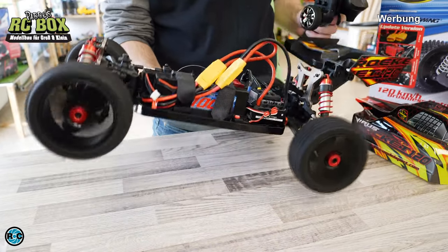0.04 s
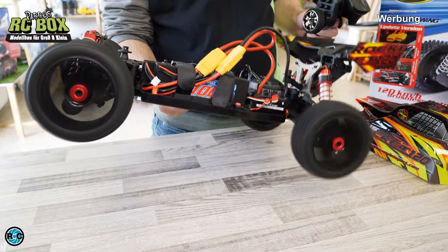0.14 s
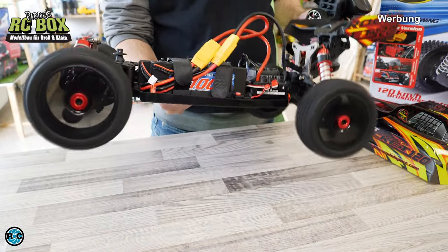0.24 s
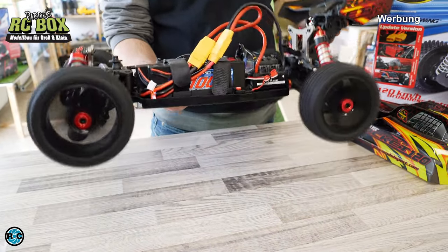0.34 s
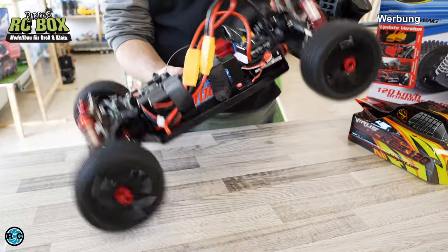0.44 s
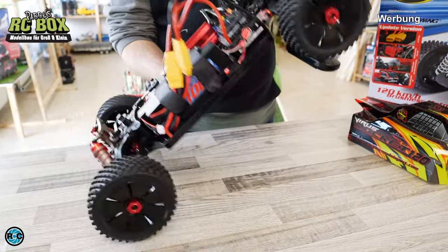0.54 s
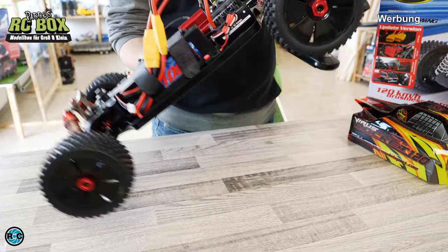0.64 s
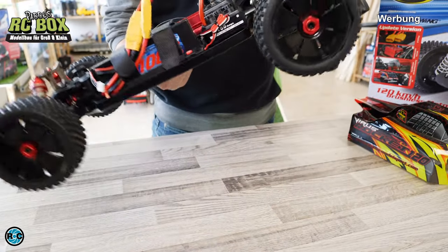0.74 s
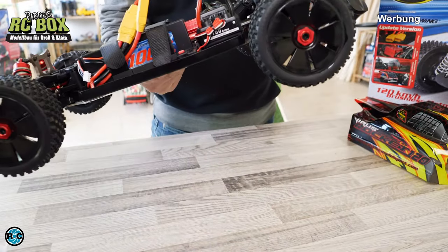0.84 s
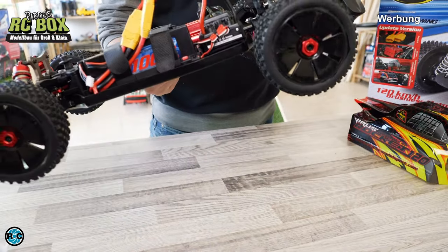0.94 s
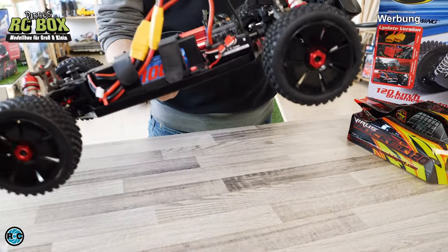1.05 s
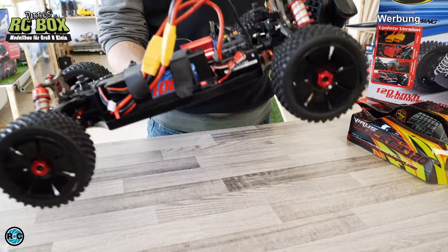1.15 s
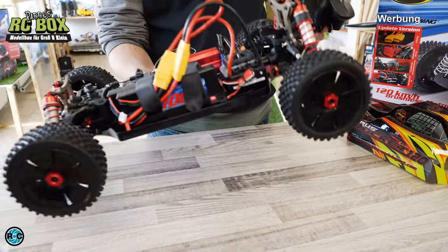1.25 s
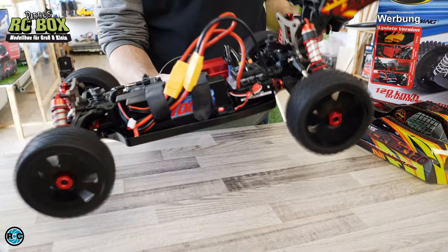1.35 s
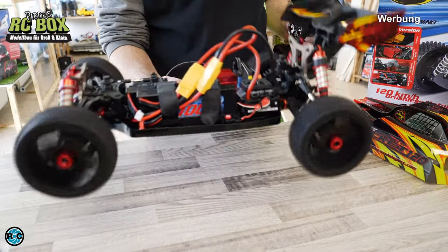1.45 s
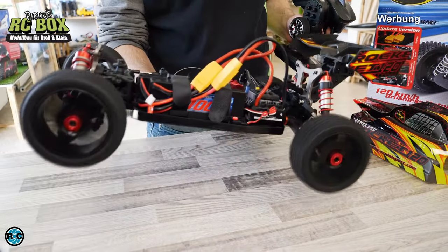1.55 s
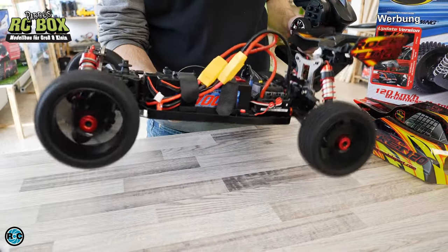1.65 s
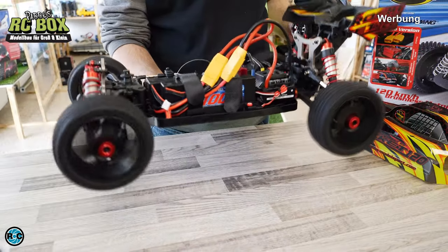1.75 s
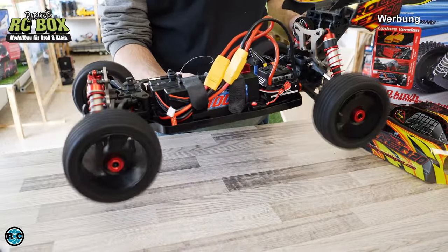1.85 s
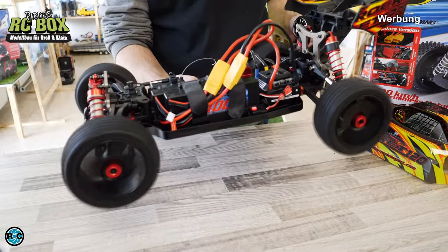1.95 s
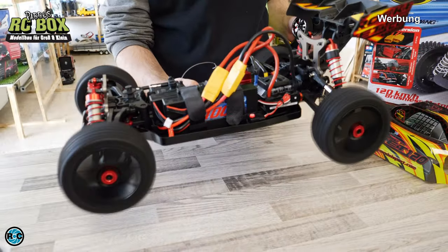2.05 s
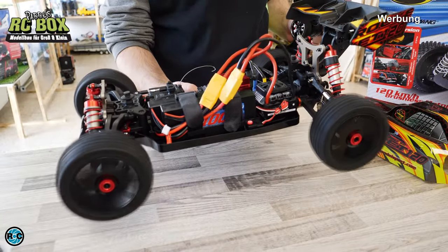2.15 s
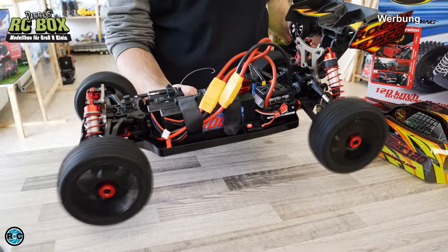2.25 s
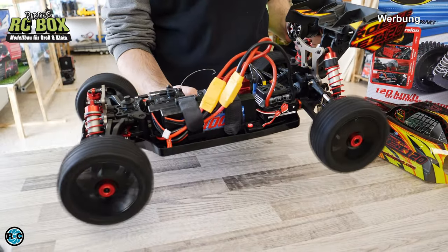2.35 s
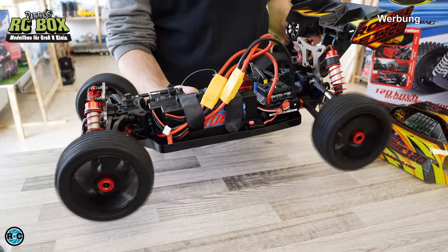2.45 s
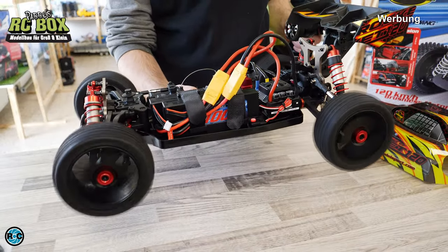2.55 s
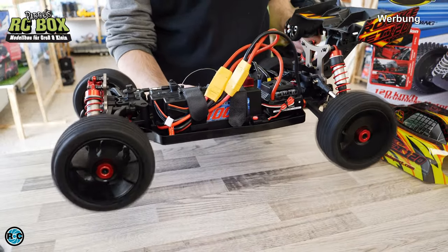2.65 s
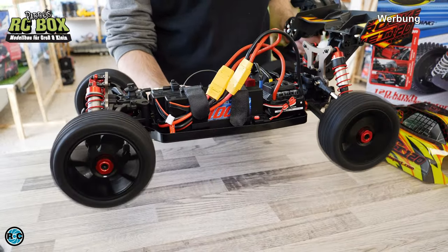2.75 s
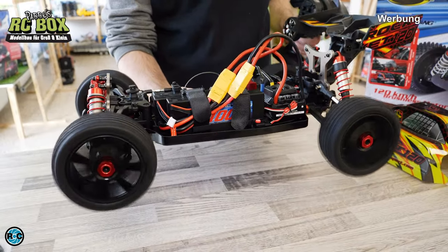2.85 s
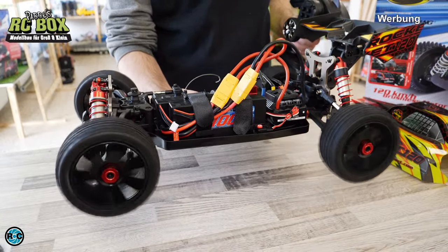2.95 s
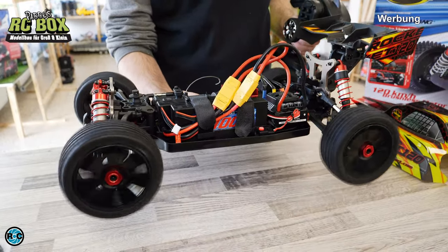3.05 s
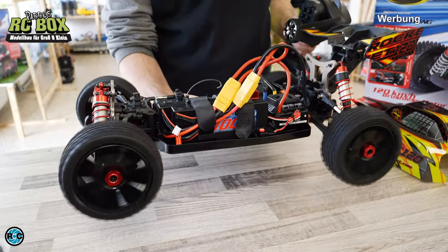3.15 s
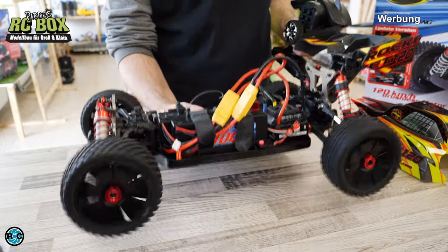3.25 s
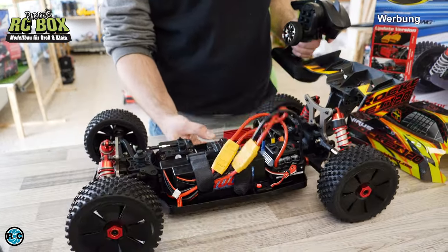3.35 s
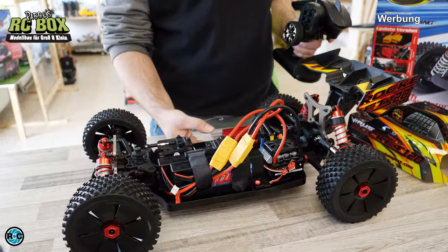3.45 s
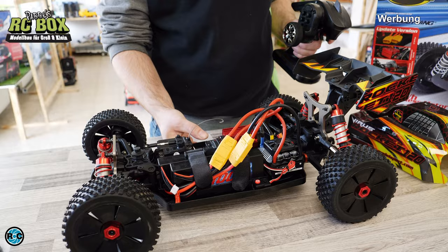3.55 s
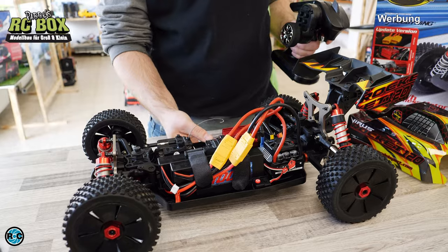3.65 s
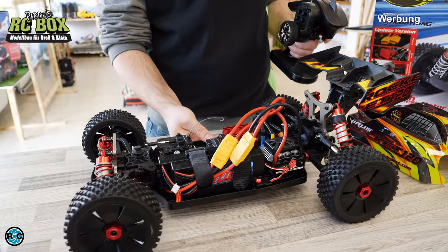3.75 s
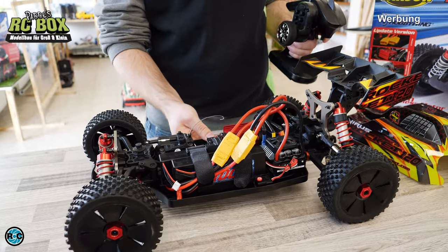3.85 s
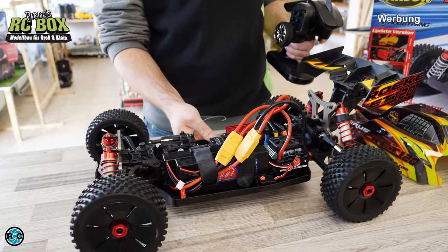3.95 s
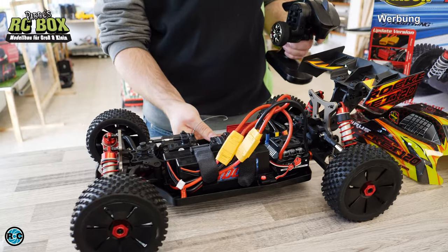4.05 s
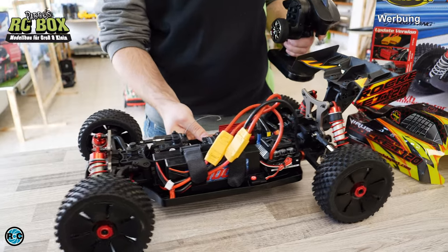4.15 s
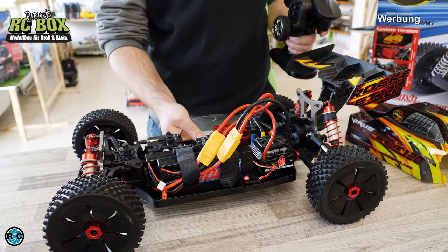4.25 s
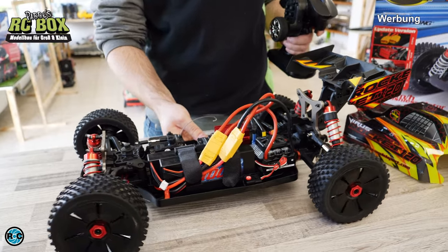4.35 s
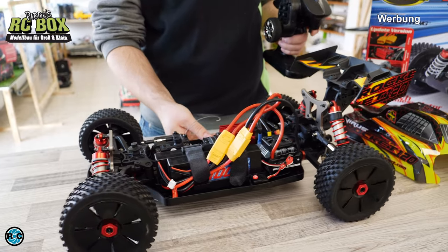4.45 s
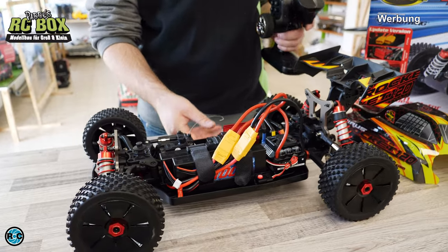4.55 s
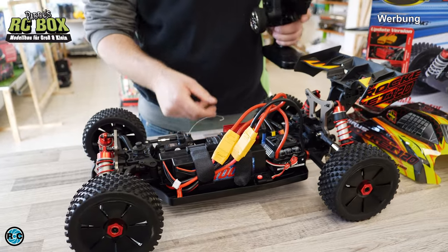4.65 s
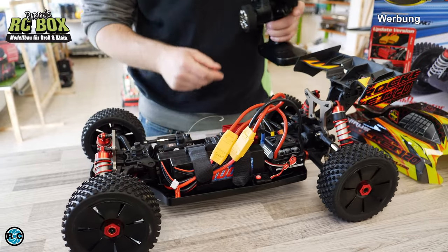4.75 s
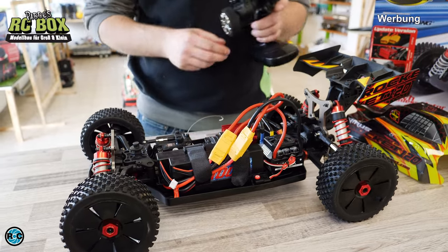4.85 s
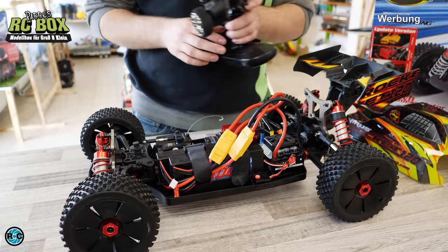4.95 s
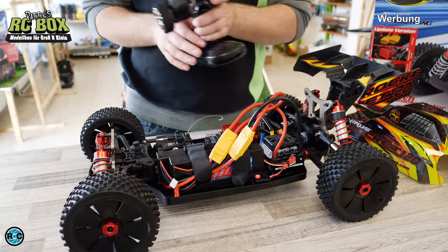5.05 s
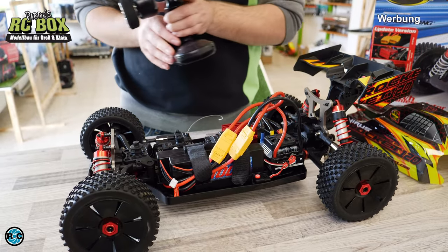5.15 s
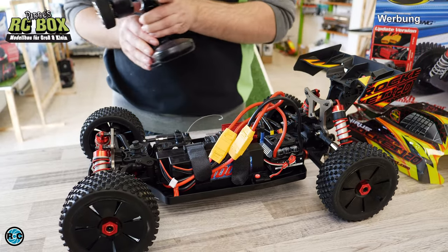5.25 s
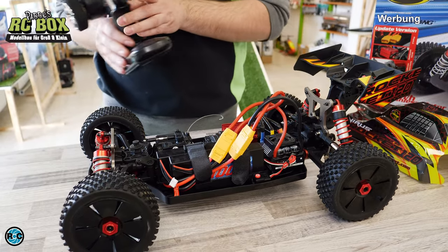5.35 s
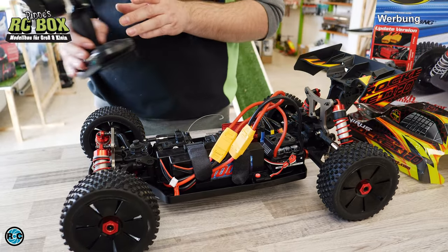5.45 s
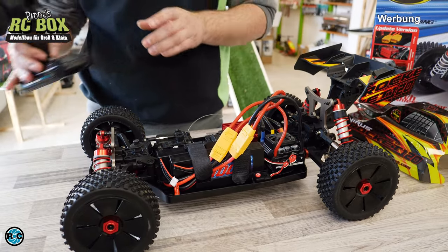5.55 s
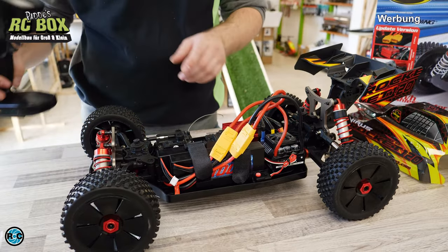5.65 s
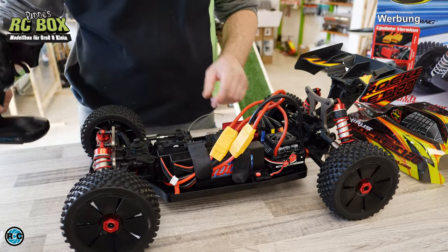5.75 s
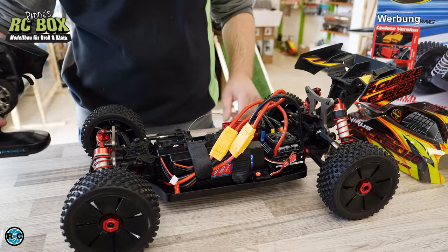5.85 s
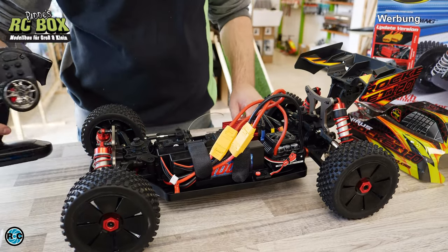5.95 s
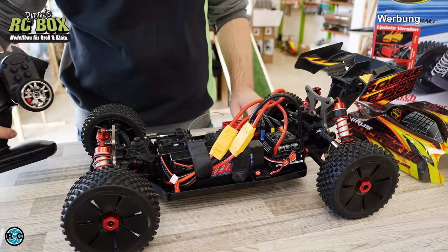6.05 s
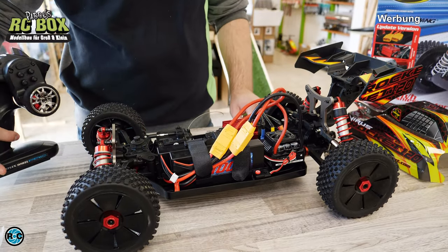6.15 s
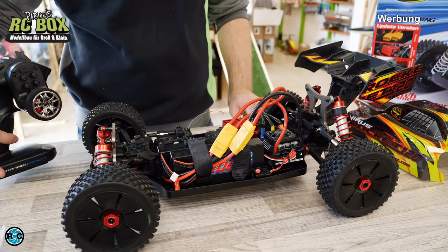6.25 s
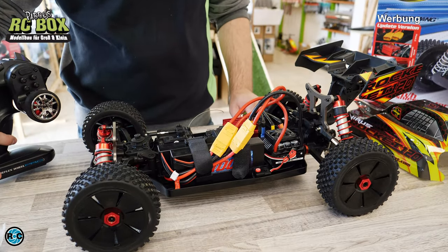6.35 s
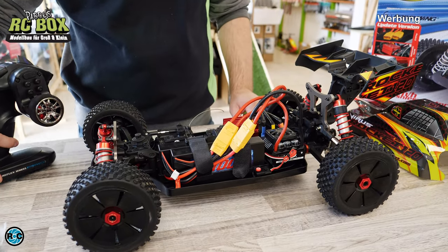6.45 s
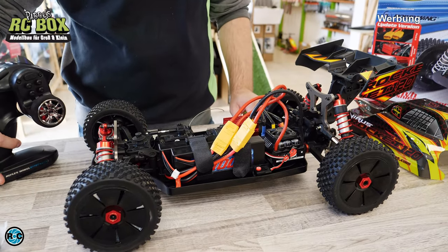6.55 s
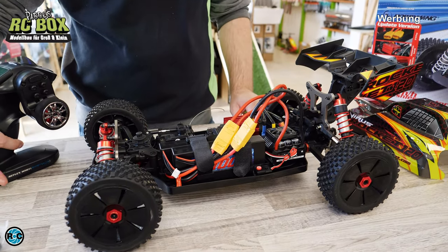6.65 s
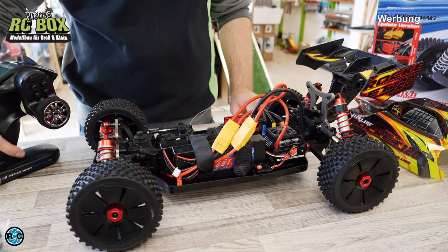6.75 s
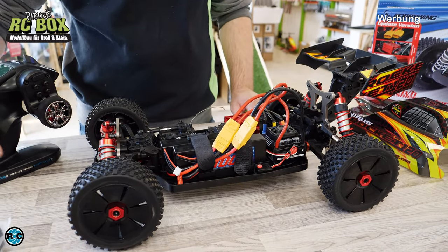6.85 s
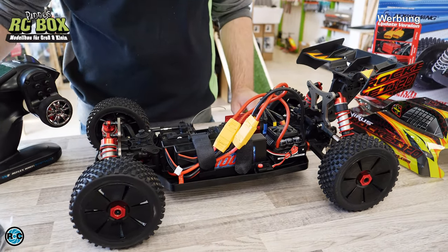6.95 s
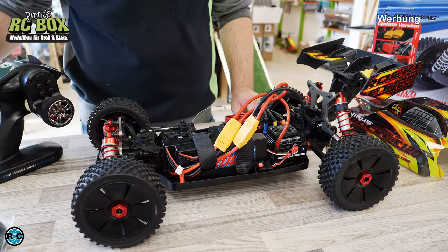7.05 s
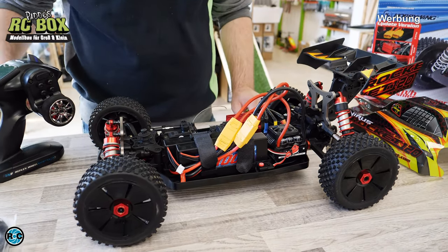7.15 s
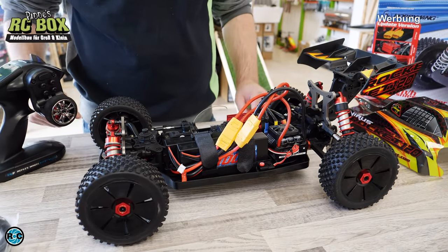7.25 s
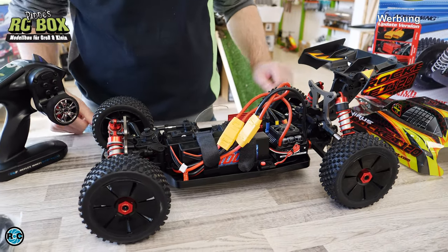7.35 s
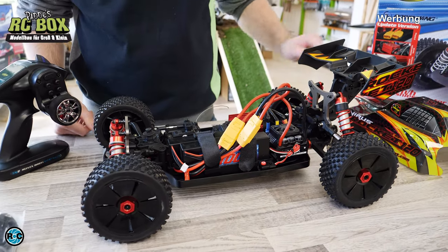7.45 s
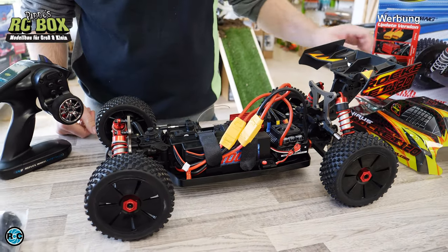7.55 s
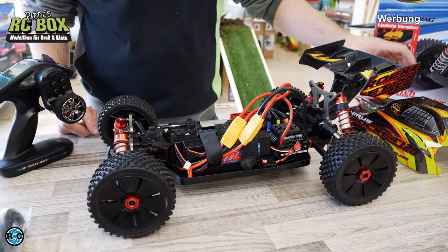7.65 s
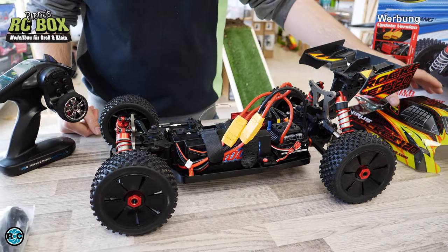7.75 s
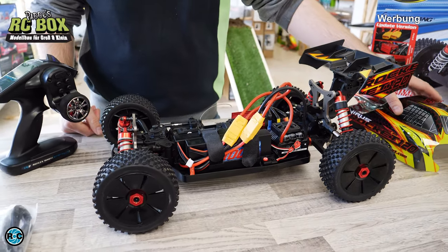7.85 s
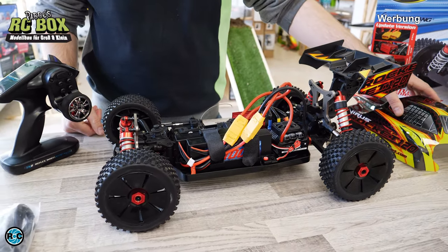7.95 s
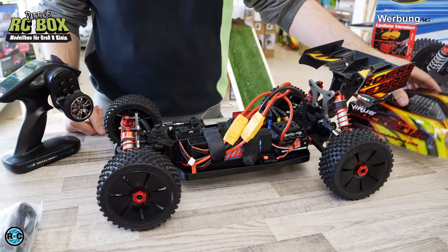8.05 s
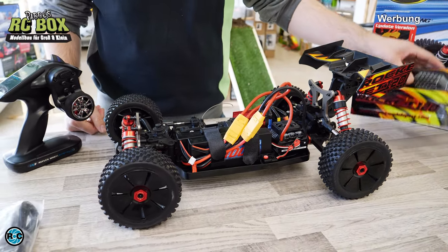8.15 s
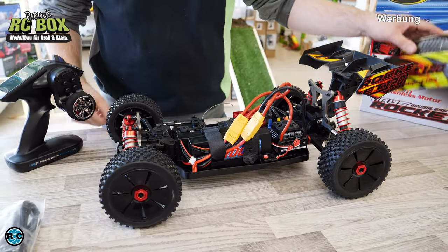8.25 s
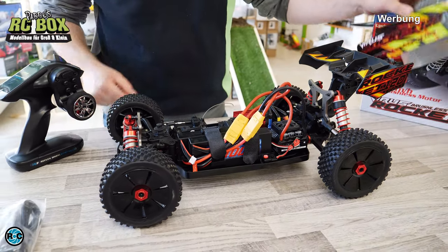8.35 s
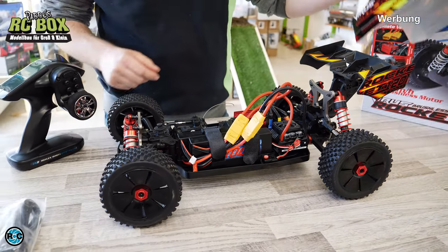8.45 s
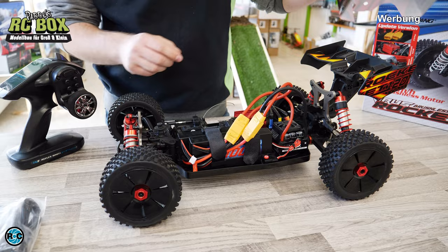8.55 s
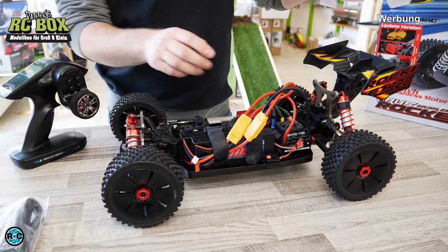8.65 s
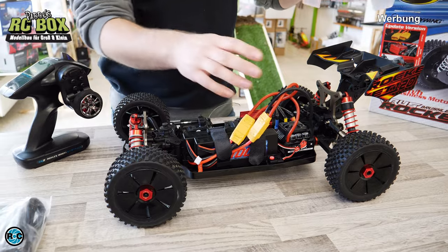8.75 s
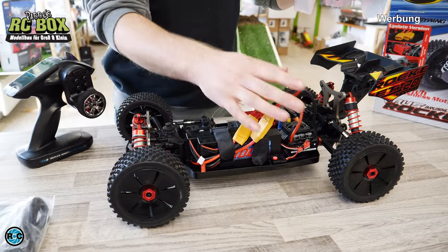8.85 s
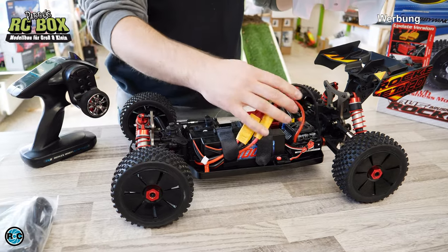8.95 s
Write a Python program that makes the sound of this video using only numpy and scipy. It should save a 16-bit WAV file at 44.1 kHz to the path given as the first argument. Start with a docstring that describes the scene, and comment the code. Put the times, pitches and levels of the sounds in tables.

```python
"""Electric model buggy over a workbench

Its motor revs, brakes with a buzz, revs again and coasts down: tooth knocks, mesh tones and chopped current.
Drive shafts slam in their play, ever more sparsely; on its tyres the car jerks in bursts of slams.
Then the transmitter is put down and the body shell picked up: knocks, rustles, a squeak and a scrape.
Struck bodies are resonant filters; air, a fan and the echoes of a small shop surround them."""
import sys
import numpy as np
from scipy import signal
from scipy.fft import rfft, irfft
from scipy.io import wavfile
from scipy.ndimage import uniform_filter1d

SR = 44100
rng = np.random.default_rng(int(sys.argv[2]) if len(sys.argv) > 2 else 0)


def store_wav(level_fs):
    """Save 16-bit WAV to argv[1]."""
    pcm = np.round(np.clip(np.atleast_2d(level_fs), -1, 1) * 32767)
    wavfile.write(sys.argv[1], SR, pcm.T.astype(np.int16))


N = 397341
T = np.arange(N) / SR
PINION_TEETH = 13
STALL_TURNS_PER_S = 32  # gears fade out below about this


def amp(db):
    """Gain of a level in dB."""
    return 10 ** (np.asarray(db) / 20)


def unit(x):
    """Scale to rms 1."""
    return x / np.sqrt(np.mean(x ** 2) + 1e-20)


def read(points, hz):
    """A spectrum, joined by straight lines over log frequency."""
    f, value = np.transpose(points)
    return np.interp(np.log(hz + 1), np.log(f + 1), value)


def add(mix, s, sound):
    """Mix a sound in at s seconds, cut at the end."""
    part = mix[..., max(round(s * SR), 0):][..., :sound.shape[-1]]
    part += sound[..., :part.shape[-1]]


def drift(rate_hz):
    """Random wander below rate_hz, rms 1."""
    spectrum = rfft(rng.standard_normal(N))
    return unit(irfft(spectrum * (np.fft.rfftfreq(N, 1 / SR) < rate_hz), N))


def envelope(on, off, attack, release, db=0):
    """Gain over time (all in s): straight attack, hold, exponential release."""
    rise = np.clip((T - on) / attack, 0, 1)
    return amp(db) * rise * np.exp(-np.clip((T - off) / release, 0, 20))


def lift(peaks, hz):
    """The dB that a set of resonances adds at a frequency."""
    return sum(g / (1 + (2 * (hz - f) / width) ** 2) for f, width, g in peaks)


def body(spectrum, peaks, splits_hz, size=4096):
    """Causal minimum-phase responses of a resonant body in three ranges: low, middle, high."""
    hz = abs(np.fft.fftfreq(size, 1 / SR))
    db = read(spectrum, hz) + lift(peaks, hz)
    low, lower = (1 / (1 + (hz / f) ** 14) for f in splits_hz[::-1])
    shares = np.sqrt([lower, abs(low - lower), 1 - low])
    log_gain = np.log(amp(db) * shares + 1e-5)
    return np.fft.ifft(np.exp(np.conj(signal.hilbert(log_gain)))).real[:, :size // 2]


def strike(responses, dbs, chatter, after_db, after, rise=0.00061):
    """A contact builds up and chatters, loose parts buzz on, the body rings; dbs set the first 7 ms."""
    t = np.arange(SR // 10) / SR
    contact = np.exp(-t / np.array(chatter)[:, None]) + amp(after_db) * np.exp(-t / after)
    contact = contact * (1 - np.exp(-t / rise))
    force = rng.choice([-1, 1], contact.shape) * contact
    rings = signal.fftconvolve(force, responses, axes=1)
    return sum(amp(db) * ring / ring[:SR // 140].std() for db, ring in zip(dbs, rings))


def hiss(spectrum):
    """Steady noise of a given colour, rms 1."""
    gain = amp(read(spectrum, np.fft.rfftfreq(N, 1 / SR)))
    return unit(irfft(rfft(rng.standard_normal(N)) * gain, N))


def shaft_speed():
    """Turns a second: a braked rev, a launch that coasts down, a last blip; never below 1."""
    # motor speed curves: t/s, shaft speed/(turns/s)
    rev = [(0, 230), (.1, 274), (.16, 291), (.3, 304), (.37, 291), (.45, 235), (.55, 135), (.7, 0)]
    launch = [(1.375, 0), (1.413, 95), (1.425, 111), (1.44, 162), (1.455, 203), (1.48, 262), (1.51, 365),
              (1.55, 404), (1.59, 431), (1.62, 432), (1.8, 359), (2, 298), (2.2, 237), (2.42, 196),
              (2.6, 153), (3, 81), (3.4, 0)]
    blip = [(3.26, 30), (3.3, 78), (3.35, 70), (3.46, 0)]
    curves = [np.interp(T, *np.transpose(c), left=0) for c in (rev, launch, blip)]
    return np.maximum(np.max(curves, axis=0), 1)


def gear_gains(speed, cruise_turns_per_s=300, attack_s=.012, release_s=.02):
    """Gains of three gear noises and three gear tones: each follows the speed and shifts under load."""
    # clatter, tooth hiss, steel ring: relative level at cruise/dB, slope/(dB per doubling of speed)
    noise_levels = [(-22, 1.5), (-25.5, 5), (-26.5, 3.2)]
    # pinion mesh, bevel mesh, growl: same columns
    tone_levels = [(-24.5, 14), (-26, 6), (-33, 13)]
    # tooth load as the motor pulls or brakes, or the wheels push it: on t/s, off t/s,
    # then added level/dB of clatter, tooth hiss, steel ring, pinion mesh, bevel mesh
    loads = [(-.02, .37, -2.5, 2.2, 2.4, 6, -10), (.385, .42, 0, 1.5, 3, -8, -10),
             (.44, .65, -7.5, -.5, -1.5, -14, -16), (1.371, 1.445, -3, -3, 4, 0, 0),
             (1.465, 1.62, -3.5, -2, 4, -2, -2), (2.1, 2.4, 0, 0, 0, 2, 1), (2.94, 3.15, 0, 0, 0, -3, 8),
             (3.28, 3.365, 1.5, 6, 8.5, 0, 19)]
    doublings = np.log2(speed / cruise_turns_per_s)
    dbs = np.array([db + slope * doublings for db, slope in noise_levels + tone_levels])
    for on, off, *added_db in loads:
        dbs[:len(added_db)] += np.outer(added_db, envelope(on, off, attack_s, release_s))
    return np.split(amp(dbs) * np.clip((speed - 1) / STALL_TURNS_PER_S, 0, 1), 2)


def gearbox_body():
    """The gearbox colours tooth noise and mesh tones."""
    # broad response: f/Hz, relative level/(dB per Hz)
    spectrum = [(100, -58.5), (250, -34.5), (380, -21.5), (490, -8), (700, -10), (1100, -6.5), (1500, 2),
                (2000, 0), (2700, -6), (3600, -13), (5000, -12), (6800, -18.5), (9500, -10), (11000, -15.5),
                (12500, -24.5), (16000, -23.5)]
    # resonances: f/Hz, width/Hz, added level/dB
    peaks = [(520, 60, 2), (630, 45, 7.5), (727, 98, -2), (835, 25, 3), (1060, 110, 4), (1290, 80, 3),
             (1490, 170, 5.5), (1900, 120, 2.5), (2230, 120, 1.5), (15200, 350, 10)]
    return body(spectrum, peaks, (3000, 8000))


def ping(hz, decay, rise=.0008):
    """A steel drive cup rings in a pair of modes, the second drawn at random."""
    t = np.arange(SR // 20) / SR
    ring = np.sin(2 * np.pi * hz * t) + .5 * np.sin(2 * np.pi * rng.uniform(8850, 9600) * t)
    ring = ring * np.exp(-t / decay) * (1 - np.exp(-t / rise))
    return ring / ring[:SR // 140].std()


def gears(frame, speed, gains, hits_per_turn=6, spread_db=1.8, rub=0.46, throb_db=1.9,
          wheel_ratio=.16, trims_db=(0, -1, -3), cups_db=-4, cups_per_turn=1.3):
    """Teeth and loose joints strike at a rate set by speed, harder once per turn of the drive shafts."""
    hit = rng.random(N) < hits_per_turn * speed / SR
    size = amp(spread_db * np.minimum(rng.exponential(1, N), 4)) * hit
    size = unit(size / np.sqrt(speed)) * rng.choice([-1, 1], N)
    wheel_phase = 2 * np.pi * np.cumsum(speed) * wheel_ratio / SR
    throb = amp(throb_db * (np.sin(wheel_phase) + drift(150)))

    joint = rng.integers(0, 8, N)
    t = np.arange(256) / SR
    contacts = rng.standard_normal((8, len(t))) * np.exp(-t / 0.00074)
    knocks = sum(signal.oaconvolve(size * (joint == k), unit(c))[:N] for k, c in enumerate(contacts))
    knocks = unit(knocks) * throb
    out = np.zeros(N)
    for k, response in enumerate(frame):
        # sliding teeth smooth the upper ranges
        force = knocks + rub * (1, 4, 3)[k] * rng.standard_normal(N)
        out += amp(trims_db[k]) * unit(signal.oaconvolve(force, response)[:N]) * gains[k]

    cup_hit = rng.random(N) < cups_per_turn * speed / SR
    hits = cup_hit * rng.uniform(.5, 1, N) * throb / np.sqrt(speed)
    cups = sum(signal.oaconvolve(hits * (joint == k), ping(hz, decay=0.0027))[:N]
               for k, hz in enumerate(np.linspace(9100, 10600, 8)))
    return out + amp(cups_db) * unit(cups) * gains[-1]


def whine(frame, speed, gains, wobble=.0035, flutter_db=4, growl_width_hz=170, mesh_db=-1.2,
          octave_db=-8, bevel_order=26 / 3, growl_order=5):
    """Mesh tones follow the shaft through the gearbox; play makes them flutter and smears a growl."""
    # driven shafts' hum: multiple of shaft speed, level/dB
    hum_orders = [(.6, -24), (0.999, -18.5), (2, -0.5), (2.44, -4)]
    # hum under power: on t/s, off t/s, attack/s, release/s, level/dB
    powered = (-.02, .39, .03, .015, -34)
    smooth_speed = uniform_filter1d(speed, SR // 80)
    phase = 2 * np.pi * np.cumsum(smooth_speed * (1 + wobble * drift(160))) / SR

    def tone(order):
        return np.sqrt(2) * unit(amp(flutter_db * drift(70))) * np.sin(order * phase)

    mesh = sum(gain * (tone(k) + amp(octave_db) * tone(2 * k))
               for k, gain in zip((PINION_TEETH, bevel_order), gains))
    smear = drift(growl_width_hz) * np.sin(growl_order * phase)
    smear = smear + drift(growl_width_hz) * np.cos(growl_order * phase)
    driven = sum(amp(db) * tone(k) for k, db in hum_orders)
    housed = signal.oaconvolve(amp(mesh_db) * mesh + gains[-1] * smear, frame.sum(0))[:N]
    return housed + envelope(*powered) * driven


def shudders(flutter_db=3.5, waver_hz=70):
    """The drive train rings unsteadily; the ring sags near full speed and lingers through the coast."""
    # one curve per rev: t/s, ring f/Hz, level/dB
    curves = [
        [(-.02, 2050, -30), (.14, 1930, -27), (.21, 1850, -30), (.26, 1530, -26), (.4, 1450, -26),
         (.45, 1450, -42)],
        [(1.372, 2540, -27), (1.41, 2620, -21), (1.44, 2620, -30), (1.495, 2620, -26), (1.535, 1950, -25),
         (1.575, 1800, -29), (1.61, 1480, -29), (1.9, 1470, -28), (2.6, 1460, -32), (3.2, 1450, -40)],
    ]
    out = np.zeros(N)
    for curve in curves:
        s, hz, db = np.transpose(curve)
        phase = 2 * np.pi * np.cumsum(np.interp(T, s, hz) + waver_hz * drift(160)) / SR
        out += amp(np.interp(T, s, db)) * (T > s[0]) * (T < s[-1]) * np.sin(phase)
    return np.sqrt(2) * out * unit(amp(flutter_db * drift(110)))


def background(rustle_db=-4, fan_db=0, air_db=-58.5):
    """Room air, the controller's small fan as wavering tones, and hands and sleeves sliding on plastic."""
    # room air: f/Hz, relative level/(dB per Hz)
    air = [(15, -75.5), (25, -41), (120, -7.5), (256, -10.5), (293, -13.5), (354, -10), (531, -13.5),
           (624, -14), (1070, -14), (1190, -15.5), (4140, -26), (4740, -21), (6380, -28), (11900, -29),
           (16000, -42.5)]
    # cooling fan tones: f/Hz, level/dB
    fan_lines = [(3774, -85), (4640, -75.5), (5600, -79.5)]
    # slides over plastic: on t/s, off t/s, attack/s, release/s, relative level/dB
    rustles = [(4.09, 4.15, .05, .02, -42), (4.58, 4.66, .03, .04, -54), (4.75, 5.15, .1, .2, -60),
               (5.05, 5.13, .08, .02, -56), (5.29, 5.37, .05, .02, -49), (5.42, 5.53, .04, .05, -56),
               (5.68, 5.76, .04, .05, -62), (5.84, 5.9, .02, .04, -61), (8.5, 8.83, .3, .14, -62),
               (8.954, 8.968, .006, .005, -38)]
    fan = np.zeros(N)
    for hz, db in fan_lines:
        pitch = hz * (1 + .001 * drift(1.5) + 0.0011 * drift(80))
        fan += amp(db + fan_db + 3 * drift(4)) * np.sin(2 * np.pi * np.cumsum(pitch) / SR)
    rub = hiss([(200, -15), (1200, 8), (5000, -4), (10000, -1), (13000, -11), (16000, -16)])
    slide = rub * amp(rustle_db + 2 * drift(40)) * sum(envelope(*r) for r in rustles)
    return amp(air_db) * hiss(air) + fan + slide


def chopper(burst, hz, lines, flutter_db):
    """Switched current makes the windings sing at a fixed pitch; each harmonic fades in its own time."""
    on, attack, level_db = burst
    out = np.zeros(N)
    for k, db, off, release in lines:
        gain = envelope(on, off, attack, release, level_db + db) * amp(flutter_db * drift(28))
        out += gain * np.sin(2 * np.pi * k * hz * T)
    return np.sqrt(2) * out


def brake_buzz():
    """The controller chops the current to brake."""
    # burst: on t/s, attack/s, level/dB
    burst = (.355, .045, -27.5)
    # lines: harmonic, relative level/dB, off t/s, release/s
    lines = [(1, 2, .615, .028), (2, -1.5, .52, .03), (3, -8.5, .57, .065), (4, -8, .5, .07),
             (5, -10.5, .5, .06)]
    return chopper(burst, 1004, lines, flutter_db=2.5)


def throttle_buzz():
    """The controller chops the current at part throttle."""
    # burst: on t/s, attack/s, level/dB
    burst = (1.371, .01, -29)
    # lines: harmonic, relative level/dB, off t/s, release/s
    lines = [(1, 0, 1.414, .009), (2, 0, 1.425, .015), (3, -10, 1.41, .01)]
    return chopper(burst, 4014, lines, flutter_db=2)


def chassis_body():
    """The chassis frame colours slams and grinding."""
    # broad response: f/Hz, relative level/(dB per Hz)
    spectrum = [(100, -53), (280, -41.5), (400, -25), (510, -9), (750, -2), (1100, -4), (1550, -3),
                (2000, -6), (2700, -6.5), (3600, -16.5), (5200, -12.5), (6800, -19), (9500, -8.5),
                (11000, -13.5), (12500, -25), (16000, -21.5)]
    # resonances: f/Hz, width/Hz, added level/dB
    peaks = [(510, 54, 2), (625, 45, 6.5), (727, 98, -2.5), (846, 25, 5), (1078.4, 70, 6), (1340, 100, 2),
             (1620, 170, 4), (2250, 160, 3), (15200, 350, 10)]
    return body(spectrum, peaks, (2000, 8000))


def clack(detune=.04, rise=.0007):
    """One clean blow rings the gear housing, detuned at random."""
    # housing modes: nominal f/Hz, relative level/dB, t60/s
    modes = [(1090, -15, .04), (1460, -1, .024), (1630, 0, .022), (2300, -12, .015)]
    t = np.arange(SR // 12) / SR
    pitch = 1 + detune * rng.uniform(-1, 1)
    ring = sum(amp(db - 60 * t / t60) * np.sin(2 * np.pi * hz * pitch * t) for hz, db, t60 in modes)
    ring = ring * (1 - np.exp(-t / rise))
    return ring / ring[:SR // 140].std()


def slams(frame, speed, trims_db=(-5.6, -5.3, -9.7), clack_db=-7.5, cup_db=-5.5, scatter=.2,
          rise=.0013, delay_s=.0005):
    """Shafts slam through their play: frame knock, housing clack, steel cup ring, then rebounds."""
    # slams: t/s, thud, clack, snap and steel ring relative level/dB, ring f/Hz
    rows = [(.649,-21,-24,-28,-30,10300), (1.3705,-8,-14,-15,-12,9000), (2.545,-22,-17,-24,-23,10600),
            (2.601,-22,-16,-24,-18,10500), (2.672,-22,-17,-26,-27,10500), (2.755,-22,-17,-26,-26,8930),
            (2.828,-21,-16,-26,-27,10400), (2.845,-22,-18,-27,-27,10500), (2.886,-21,-17,-26,-23,10400),
            (2.926,-21,-17,-28,-23,9510), (2.968,-17,-17,-26,-23,10600), (2.983,-19,-14,-26,-21,9580),
            (3.048,-21,-16,-23,-20,9560), (3.103,-18,-17,-28,-26,9470), (3.141,-21,-18,-31,-25,9500),
            (3.168,-22,-21,-30,-24,9480), (3.186,-19,-17,-26,-20,10500), (3.229,-20,-16,-25,-25,10500),
            (3.261,-21,-20,-27,-24,9460), (3.296,-17,-19,-24,-19,9490), (3.36,-13,-19,-20,-18,9250),
            (3.424,-24,-28,-35,-34,9420), (3.922,-23,-20,-27,-15,9230), (3.945,-29,-30,-29,-23,8910),
            (3.967,-21,-16,-24,-21,9400), (3.973,-23,-22,-28,-21,10300), (3.985,-29,-29,-30,-27,8910),
            (4.005,-22,-15,-24,-22,9500), (4.011,-25,-26,-31,-23,10400), (4.023,-25,-29,-31,-25,8930),
            (4.152,-26,-22,-28,-24,10600), (4.18,-20,-15,-22,-19,10500), (4.186,-19,-17,-25,-16,9290),
            (4.204,-19,-17,-26,-19,9190), (4.212,-21,-21,-25,-17,9210), (4.24,-16,-19,-25,-17,9220),
            (4.246,-19,-20,-27,-12,9500), (4.291,-18,-18,-27,-22,8980), (4.315,-24,-32,-30,-22,9030),
            (4.329,-24,-27,-33,-33,8920), (4.351,-23,-22,-30,-28,9500), (4.365,-19,-24,-31,-29,9490),
            (4.385,-25,-23,-32,-31,9540), (4.409,-23,-20,-28,-23,9480), (4.439,-19,-17,-24,-12,9250),
            (4.447,-22,-20,-29,-19,9500), (4.46,-22,-22,-28,-21,9240), (4.471,-19,-18,-27,-25,9280),
            (4.499,-21,-20,-28,-22,10400), (4.515,-22,-21,-29,-24,9050), (4.524,-20,-21,-28,-20,9500),
            (4.533,-24,-20,-28,-29,9180), (4.562,-22,-16,-25,-28,10400)]
    # slams among the running gear noise: added level/dB for thud, clack, snap, steel ring
    running_db = (-4, -.5, -9.5, -2)
    # rebounds: nominal delay/s, level/dB
    rebounds = [(.0062, -12), (.019, -17)]
    out = np.zeros(N)
    for s, *dbs, hz in rows:
        running = min(speed[round(s * SR)] / STALL_TURNS_PER_S, 1)
        thud, housing, snap, steel = np.add(dbs, running * np.array(running_db))
        for rebound_s, db in [(0, 0)] + rebounds:
            knock = strike(frame, np.add((thud, snap, steel), trims_db), chatter=(.0026, .0022, .002),
                           after_db=-17, after=.019, rise=rise)
            # each blow starts slightly after its listed time
            at = s + delay_s + rebound_s * (1 + scatter * rng.uniform(-1, 1))
            housing_ring = amp(housing + clack_db) * clack()
            cup_ring = amp(steel + cup_db) * ping(hz, decay=0.003, rise=rise)
            for part in (knock, housing_ring, cup_ring):
                add(out, at, amp(db) * part)
    return out


def taps(rows, plastic, trims_db, chatter, rise):
    """Dry plastic knocks, each panned by its left-right level difference."""
    out = np.zeros((2, N))
    for s, *dbs, pan_db in rows:
        tap = strike(plastic, np.add(dbs, trims_db), chatter=chatter, after_db=-15, after=0.018, rise=rise)
        add(out, s, tap * amp([[pan_db / 2], [-pan_db / 2]]))
    return out


def handling():
    """Parts and transmitter click, the thin shell knocks with a hollower ring; scrape and squeak join."""
    # plastic parts' taps: t/s, body, clack and tick relative level/dB, left-right/dB
    part_taps = [(0.788, -56, -46, -58, 0.5), (3.378, -28, -22, -36, 0.5), (3.402, -32, -26, -40, 0.5),
                 (3.724, -38, -49, -50, 1.0), (4.705, -42, -47, -48, 0.5), (4.743, -42, -44, -51, -0.5),
                 (4.818, -35, -54, -57, 1.5), (4.861, -32, -46, -42, 1.0), (4.953, -46, -49, -62, 0.5),
                 (5.064, -43, -52, -60, 0.5), (5.106, -38, -48, -60, 0.5), (5.134, -29, -35, -34, 1.0),
                 (5.143, -28, -36, -41, 0.5), (5.299, -45, -51, -54, 1.0), (5.377, -36, -41, -46, 0.5),
                 (5.851, -45, -55, -61, 1.0), (5.943, -19, -37, -42, 1.0), (6.489, -17, -27, -39, 4.5),
                 (6.497, -21, -35, -53, 2.0), (6.555, -22, -39, -58, 3.5), (6.571, -25, -40, -63, 2.0),
                 (6.659, -25, -33, -40, 4.0), (6.779, -39, -52, -55, 3.0)]
    # plastic's response: f/Hz, relative level/(dB per Hz)
    plastic = [(71, -17), (120, -5.5), (308, -3), (1010, 9.5), (2480, -6.5), (3110, -8), (5630, -18.5),
               (7200, -15), (12300, -17), (15000, -27), (16000, -27)]
    # its resonances: f/Hz, width/Hz, added level/dB
    plastic_peaks = [(432, 94, 5), (588, 52, 9.5), (880, 86, 1), (1065, 66, -1), (1460, 270, 4),
                     (2200, 340, 2.5), (2870, 270, 4.5), (4100, 400, 4)]
    # shell lifted and brought over the car: t/s, body, clack and tick relative level/dB, left-right/dB
    shell_knocks = [(7.928, -21, -35, -44, -3.5), (7.950, -20, -31, -48, -2.5),
                    (7.955, -20, -32, -52, -0.5), (8.026, -28, -39, -52, -2.0),
                    (8.9605, -22, -39, -31, -0.5), (8.9705, -21, -29, -24, 0.0)]
    # shell's response: f/Hz, relative level/(dB per Hz)
    shell_spectrum = [(100, -14), (350, -6), (1000, 3), (2300, -5), (4000, -11), (5600, -21), (7000, -16),
                      (9300, -11), (12500, -13), (16000, -22)]
    # its resonances: f/Hz, width/Hz, added level/dB
    shell_peaks = [(522, 90, 7), (980, 130, 10), (1700, 140, 4), (2310, 90, 4), (3170, 150, 5)]
    parts = taps(part_taps, body(plastic, plastic_peaks, (1800, 5000)),
                 trims_db=(-10.6, -4.6, -3.8), chatter=(.004, .003, .002), rise=.0012)
    shell = taps(shell_knocks, body(shell_spectrum, shell_peaks, (1800, 5000)),
                 trims_db=(-9.5, -4.2, -3), chatter=(.003, .003, .002), rise=.0008)
    return parts + shell + scrape() + squeak()


def pull(speed, flutter_db=1.8, wobble=.012, weak_share=.5):
    """At the launch loaded teeth sing, flaring as they sweep through resonances, the pinion most."""
    # singing: on t/s, off t/s, attack/s, release/s, level/dB
    singing = (1.404, 1.52, .008, .03, -37)
    # tones: multiple of shaft speed, relative level/dB
    orders = [(4.333, -2), (8.667, -5), (13, 0)]
    # resonances: f/Hz, width/Hz, pinion's added level/dB
    peaks = [(300, 400, -20), (950, 250, 5), (1370, 420, 17.5), (2100, 450, 10), (2580, 380, 18.5),
             (3900, 900, -4), (4850, 400, 7)]
    phase = 2 * np.pi * np.cumsum(speed * (1 + wobble * drift(300))) / SR
    tones = np.zeros(N)
    for k, db in orders:
        flare_db = lift(peaks, k * speed) * (1 if k == PINION_TEETH else weak_share)
        tones += amp(db + flare_db + flutter_db * drift(200)) * np.sin(k * phase)
    return np.sqrt(2) * tones * envelope(*singing)


def landing(count=3, land_s=3.354, land_db=-35, axle_lag_s=.02, bounce_s=.185, bounce_share=.75,
            bounce_loss_db=-8.5):
    """One axle lands, then the other; bounces get shorter and weaker. Rows t/s, relative level/dB."""
    times = land_s + np.cumsum(bounce_s * bounce_share ** np.arange(count))
    bounces = [(s, land_db + bounce_loss_db * k) for k, s in enumerate(times, 1)]
    return [(land_s, land_db), (land_s + axle_lag_s, land_db)] + bounces


def bumps(bump_db=-3, rise=0.0055):
    """The bench top booms in its low modes, pushed by soft rubber."""
    # jerking tyres, transmitter and shell bump the bench: t/s, relative level/dB
    rows = [(3.92, -46), (4.01, -47), (4.25, -53), (4.445, -54), (5.948, -44), (6.492, -49), (6.557, -42),
            (6.663, -40), (7.935, -49)]
    # bench modes: nominal f/Hz, relative level/dB, t60/s
    modes = [(67, -11.5, 0.15), (106, -3, 0.25), (140, 2.5, .25), (187.6, 0.5, .2), (234, 1, 0.14),
             (294.5, -3, .22), (361, -3, 0.18), (428, -1, 0.13)]
    t = np.arange(SR // 2) / SR
    out = np.zeros(N)
    for s, db in landing() + rows:
        boom = np.zeros(len(t))
        for hz, mode_db, t60 in modes:
            cycles = hz * rng.uniform(0.89, 1.04) * t + rng.random() / (2 * np.pi)
            boom += amp(mode_db - 60 * t / t60) * np.sin(2 * np.pi * cycles)
        boom = boom * (1 - np.exp(-(t / rise) ** 2))
        add(out, s, amp(db + bump_db) * boom / boom[:SR // 50].std())
    return out


def grind(frame, rough_db=4):
    """Strained teeth rub unevenly between the slams."""
    # strain: on t/s, off t/s, attack/s, release/s, level/dB
    strain = (4.17, 4.57, .02, .035, -37.5)
    rub = rng.standard_normal(N) * amp(rough_db * drift(200))
    return unit(signal.oaconvolve(rub, frame.sum(0))[:N]) * envelope(*strain)


def squeak(waver=.012, flutter_db=4):
    """Fingers squeak faintly on the transmitter's grip: two wavering tones."""
    # squeak: on t/s, off t/s, attack/s, release/s, level/dB
    slip = (5.46, 5.54, .04, .015, -62)
    # tones: mean f/Hz, relative level/dB
    lines = [(2400, 0), (4230, -3)]
    tones = np.zeros(N)
    for hz, db in lines:
        phase = 2 * np.pi * np.cumsum(hz * (1 + waver * drift(200))) / SR
        tones += amp(db + flutter_db * drift(60)) * np.sin(phase)
    return tones * envelope(*slip)


def scrape(scrape_db=-2.5, grip_db=2.5):
    """The thin shell drags over the bench as it is picked up: coloured noise of uneven grip."""
    # drag: on t/s, off t/s, attack/s, release/s, relative level/dB
    drag = (7.897, 8.02, .022, .025, -39)
    rub = hiss([(150, -25), (380, -8), (540, 5), (780, -5), (1050, 1), (1300, -1), (2200, -8),
                (4000, -18), (9000, -30), (16000, -42)])
    rub = unit(rub * amp(grip_db * drift(120)))
    return amp(scrape_db) * rub * envelope(*drag) * amp([[-1.5], [1.5]])


def room(x, wet_db=-10, early_db=5, early=0.028):
    """Bench and shelves throw back early echoes, then a short diffuse tail."""
    # late decay: f/Hz, t60/s
    decay = [(100, 0.15), (500, 0.5), (2000, 0.31), (6000, 0.58), (10000, .36), (16000, .22)]
    echoes = rng.choice([-1., 1.], SR // 2) * (rng.random(SR // 2) < .08)
    hz, t, z = signal.stft(echoes, SR, nperseg=256)
    fade = amp(-60 * t / read(decay, hz)[:, None]) * (1 + amp(early_db) * np.exp(-t / early))
    tail = signal.istft(z * fade, SR, nperseg=256)[1]
    tail[:SR // 300] = 0
    return amp(wet_db) * signal.oaconvolve(x, tail[None] / np.linalg.norm(tail), axes=1)[:, :N]


def widen(x, spread=0.022):
    """Reflections reach the two microphones differently: a diffuse side signal of opposite signs."""
    # stereo width: f/Hz, side over middle/dB
    width = [(60, -37), (250, -27), (500, -21.5), (1400, -15), (2800, -12), (5000, -7), (9500, -20.5),
             (11000, -17.5), (14000, -8)]
    t = np.arange(SR // 5) / SR
    echoes = rng.standard_normal(len(t)) * np.exp(-t / spread)
    side = signal.oaconvolve(x.mean(0), echoes / np.linalg.norm(echoes))[:N]
    side = irfft(rfft(side, 2 * N) * amp(read(width, np.fft.rfftfreq(2 * N, 1 / SR))))[:N]
    return x + np.array([side, -side])


def scene():
    """The car near the middle, the handling knocks around it, all in the shop."""
    speed = shaft_speed()
    noise_gains, tone_gains = gear_gains(speed)
    gearbox, frame = gearbox_body(), chassis_body()
    car = gears(gearbox, speed, noise_gains) + whine(gearbox, speed, tone_gains) + shudders()
    car = car + brake_buzz() + slams(frame, speed) + throttle_buzz() + pull(speed) + grind(frame)
    dry = (car + bumps()) * amp([[.15], [-.15]]) + handling()
    return widen(dry + room(dry) + background())


def record(dry, low_cut_hz=62, edge_hz=15900):
    """The microphone's bass cut, full-scale clipping, then the band limit."""
    thin = signal.sosfilt(signal.butter(2, low_cut_hz, "high", fs=SR, output="sos"), dry)
    band = signal.firwin(301, edge_hz, window=("kaiser", 8), fs=SR)
    return signal.oaconvolve(np.clip(thin, -1, 1), band[None], "same")


dry = scene()
out = record(dry)
store_wav(out)
```